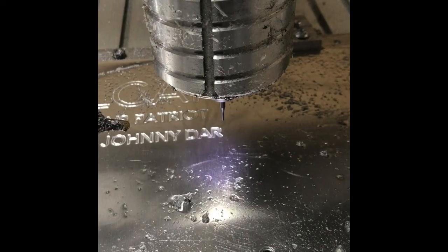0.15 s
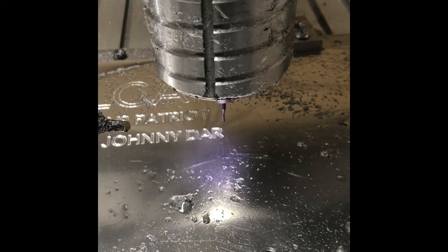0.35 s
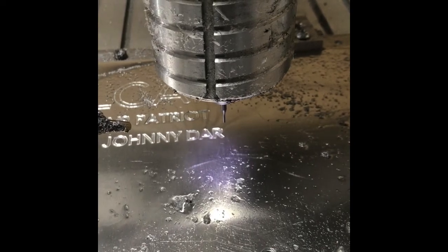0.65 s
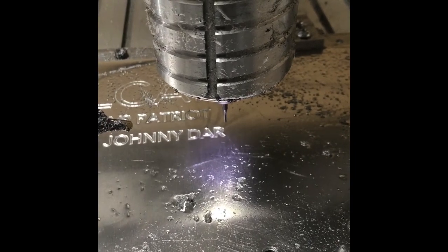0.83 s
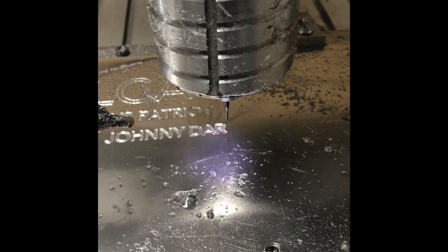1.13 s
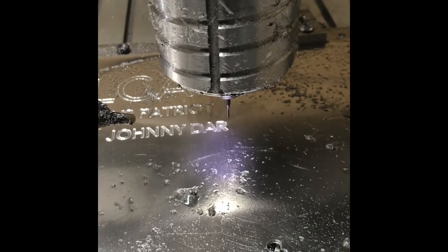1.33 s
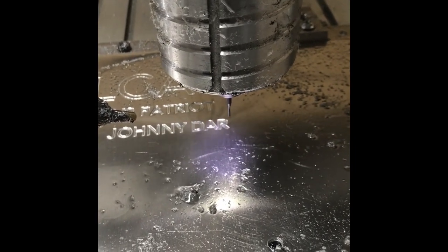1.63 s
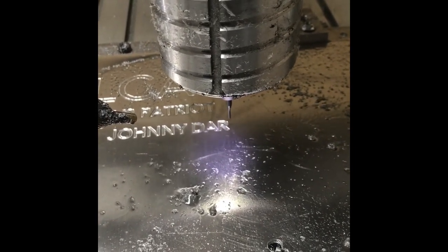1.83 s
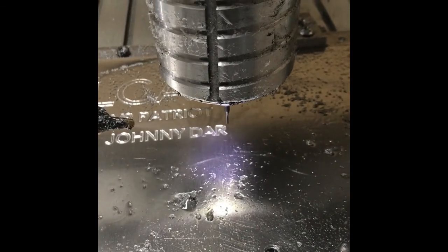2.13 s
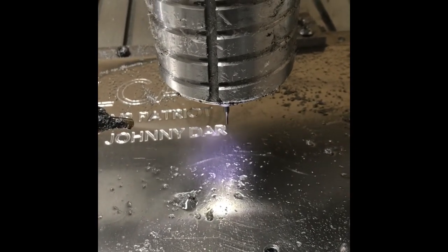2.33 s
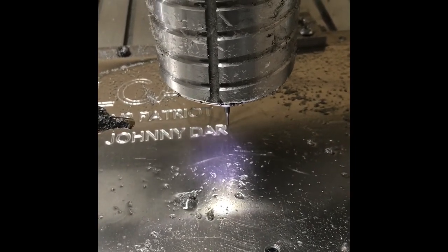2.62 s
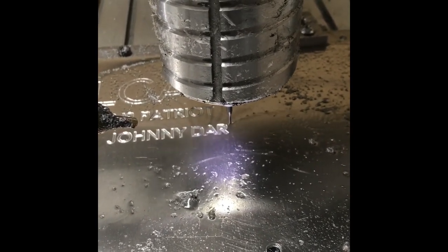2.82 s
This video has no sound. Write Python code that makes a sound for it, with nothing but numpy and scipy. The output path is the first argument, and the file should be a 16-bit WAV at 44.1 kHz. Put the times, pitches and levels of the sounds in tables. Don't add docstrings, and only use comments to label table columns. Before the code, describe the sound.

A high-speed spindle engraving sheet metal, close and nearly mono. Silence until 0.07 s, quick fade-in, steady whine around 450 Hz with strong high overtones and hissing roar, faint spark ticks. It fades to silence around 0.3-0.4 s, returning fully by 0.45. A tiny dip with faint thud at 1.53, slightly brighter hiss after. From 2.7 low hum swells; around 2.8 a rising rasp and squeal as the cutter lifts, then a lighter whine to the end.

```python
import sys
import numpy as np
from scipy import signal
from scipy.fft import rfft, irfft, next_fast_len
from scipy.io import wavfile
from scipy.ndimage import map_coordinates

SR = 44100
rng = np.random.default_rng(int(sys.argv[2]) if len(sys.argv) > 2 else 0)


def to_linear_factor(level_db):
    exponent = np.asarray(level_db, float) / 20
    return 10 ** exponent


def digitize_waveform(pressure):
    field = np.atleast_2d(pressure).T
    bounded = np.clip(field, -1, 1)
    quanta = np.round(bounded * 32767).astype(np.int16)
    wavfile.write(sys.argv[1], SR, quanta)


N = 130977
T = np.arange(N) / SR

RIPPLE_HZ = 119.87
DIP_S = 1.529
EASE_S, EASE_TAKES_S = 2.69, .1
LIFT_S, LIFT_TAKES_S = 2.815, .018

# time in seconds, tone level in dB.
TONE_GATE = [
    (.08, 2.5),
    (.13, 1),
    (.27, 1),
    (.292, -14),
    (.42, -12),
    (.438, -8),
    (.445, 0),
]


def unit(x):
    return x / np.sqrt(np.mean(x ** 2) + 1e-20)


def curve(rows):
    return np.interp(T, *np.transpose(rows))


def wobble(rate):
    knots = rng.standard_normal(int(N * rate / SR) + 4)
    return map_coordinates(knots, [T * rate])


def bump(at_s, lasts_s):
    return np.exp(-.5 * ((T - at_s) / lasts_s) ** 2)


def step(at_s, takes_s):
    return np.clip((T - at_s) / takes_s + .5, 0, 1)


def filtered(x, gain):
    m = next_fast_len(N + 8192)
    return irfft(rfft(x, m) * gain(np.fft.rfftfreq(m, 1 / SR)), m)[:N]


def band(center_hz, width_hz):
    return lambda hz: 1 / (1 + (2 * (hz - center_hz) / width_hz) ** 4)


def noise(gain):
    return unit(filtered(rng.standard_normal(N), gain))


def tone(turns, db, order):
    level = to_linear_factor(db + .15 * np.sqrt(order + 1) * wobble(20))
    return np.sqrt(2) * level * np.sin(2 * np.pi * (turns + rng.random()))


def shaft():
    # time in seconds, speed in turns per second.
    speed = [(.2, 450.7), (.5, 450.8), (.6, 451.4), (.95, 450.5), (1.32, 450.7), (1.55, 452.4),
             (1.7, 452.8), (1.9, 451.9), (2.35, 450.6), (2.8, 450.4), (2.97, 451.5)]
    return np.cumsum(curve(speed)) / SR + .0012 * wobble(40)


def whine(turns):
    orders = [1, 2, 3, 4, 5, 6, 7, 8, 9, 12, 13, 16, 18, 24, 26, 27, 29]
    # level in dB while cutting, change in dB after the brief dip, change in dB once lifted.
    order_levels = [(-25.2, .5, -6), (-47, 0, 0), (-40.5, 1.5, 2), (-24.8, 0, 0), (-29.7, -1.2, -17),
                    (-31.7, -1, -4), (-33.3, -2.5, -15), (-34.3, 0, 2), (-42, 2, 9), (-27.3, 0, 0),
                    (-24, 0, -1), (-40, 1, 0), (-42.5, 2, 3), (-42, -1, 0), (-35, 0, 0), (-47, 0, 0),
                    (-48, 0, 0)]
    cage_orders = [
        .705,
        1.041,
        7.06,
    ]
    # level in dB while cutting, change in dB once lifted.
    cage_levels = [(-47.5, -16), (-41.5, -11), (-47.5, -9)]
    side_orders = [(1, -2), (3, 2), (4, -1), (5, -3), (4, 2), (5, -1.5), (5, -1), (5, -.5), (5, 1), (6, -2),
                   (7, -2), (6, 2), (7, -1), (7, .5), (8, -3), (7, 1), (7, 1.5), (8, -2), (9, -2), (8, 2),
                   (14, -1), (13, 3), (21, 0), (4, 3), (.401, 0), (0, 2), (4, 1), (4, 1.5), (5, -2),
                   (6, -1), (8, 1), (25, 0)]
    # level in dB while cutting, change in dB once lifted.
    side_levels = [(-40.4, -15), (-45, 0), (-43, 0), (-45.5, 0), (-34.6, -3), (-45, 0), (-44, 0), (-48, 0),
                   (-43, 3), (-47, 0), (-47, 0), (-47, 0), (-49, 0), (-47, 0), (-44, 0), (-36.5, -4),
                   (-46, 0), (-48, 0), (-44, 0), (-39.5, -8), (-45, 0), (-46, 0), (-50, 0), (-52, 13),
                   (-52, -3), (-56, 0), (-50, 0), (-50, 0), (-50, 0), (-50, 0), (-47, 0), (-49, 0)]
    order_drift = {1: [(1.5, 0), (1.68, 2.2), (1.9, 0)], 4: [(2.1, 0), (2.3, 2), (2.65, 2.2), (2.9, 4.8)],
                   12: [(.3, 1), (.5, 0), (1.32, 0), (1.42, -9), (1.6, -8), (1.75, -5.5), (2.3, -6),
                   (2.45, -3.5), (2.75, -2), (2.77, -14), (2.81, -14), (2.83, -2)], 26: [(1.6, 0),
                   (2.2, -3), (2.9, -6)], 1.041: [(1.46, 0), (1.56, -16), (1.82, -16), (1.95, 0)]}

    moved = step(DIP_S, .02)
    eased = step(EASE_S, EASE_TAKES_S)
    lifted = step(LIFT_S, LIFT_TAKES_S)

    def drift(k):
        return curve(order_drift.get(k, [(0, 0)]))

    tones = []
    for k, (db, shift, change) in zip(orders, order_levels):
        tones.append((k, 0, db + shift * moved + drift(k), change))
    for k, (db, change) in zip(cage_orders, cage_levels):
        tones.append((k, 0, db + drift(k), change))
    for (k, m), (db, change) in zip(side_orders, side_levels):
        tones.append((k, m, db, change))

    total = np.zeros(N)
    for k, m, db, change in tones:
        follows_cut = k in range(4, 8) or (k < 1 and m == 0)
        released = eased if follows_cut else lifted
        total += tone(k * turns + m * RIPPLE_HZ * T, db + change * released, order=k)
    return total


def roar(turns):
    # frequency in Hz, level in dB.
    low_spectrum = [(18, -65.5), (30, -53), (205, -14.5), (387, -20.5), (450, -4), (522, -10.5), (1690, -8),
                    (1790, -5), (2600, -11), (3380, -58), (5720, -120)]
    high_spectrum = [(1530, -20.5), (2600, -14.5), (3260, -8.5), (3440, -9.5), (6050, -4), (6190, -2.5),
                     (10300, -14), (13100, -11.5), (15800, -19)]
    # frequency in Hz, width in Hz, boost in
    # dB.
    resonances = [(680.5, 114, 11), (958, 51, 8.5), (1310, 590, 10), (3200, 160, -1.5), (4480, 950, 5.8),
                  (5240, 230, 7.5), (6300, 300, -1), (8500, 450, 4), (11560, 1400, 5), (12900, 550, 2.5),
                  (10630, 500, -3), (2700, 370, 3), (14500, 700, 5), (470, 140, -4),
                  (4350, 150, 2.5), (4650, 200, 3), (4980, 180, -3.5), (5650, 200, 3), (6010, 220, -4),
             (2000, 500, -2.3), (1760, 60, -3), (2760, 80, -3), (2850, 100, 3), (800, 120, -2),
             (490, 25, -5), (7750, 300, -2), (3930, 80, -4), (14000, 500, 1.5)]
    # time in seconds, share added.
    sheet_ring = [
        (.25, .2),
        (.5, .08),
        (1.1, .08),
        (1.35, -.12),
        (2.4, -.12),
        (2.6, -.24),
    ]
    # time in seconds, share added.
    hiss = [
        (.5, -.07),
        (1.5, -.03),
        (1.75, .08),
    ]

    def through_metal(spectrum):
        f, db = np.transpose(spectrum)

        def gain(hz):
            total_db = np.interp(np.log(hz + 1), np.log(f + 1), db)
            for center_hz, width_hz, boost_db in resonances:
                total_db = total_db + boost_db / (1 + (2 * (hz - center_hz) / width_hz) ** 2)
            return to_linear_factor(total_db)
        return gain

    bass_lift_db = -.35 * np.minimum(curve(TONE_GATE), 0)
    low = to_linear_factor(-27.5 + bass_lift_db + .17 * wobble(7.8)) * noise(through_metal(low_spectrum))
    bass = filtered(low, lambda hz: 1 / (1 + (hz / 480) ** 8))
    low = low + bass * (to_linear_factor(-6 * step(LIFT_S, LIFT_TAKES_S)) - 1)
    chips = noise(band(3250, 450))
    low = low + to_linear_factor(-38 - 6 * step(EASE_S, EASE_TAKES_S)) * chips

    high = to_linear_factor(-20 + .21 * wobble(7.7)) * noise(through_metal(high_spectrum))
    high = high - .45 * bump(2.785, .025) * filtered(high, band(5000, 1400))
    high = high + curve(sheet_ring) * filtered(high, band(4600, 1100))
    high = high + curve(hiss) * filtered(high, lambda hz: (hz > 8200) * (hz < 11500))

    mains_pulse = 1 + .17 * np.sin(4 * np.pi * RIPPLE_HZ * T)
    turn_pulse = 1 + .07 * np.sin(2 * np.pi * turns)
    return low * mains_pulse + high * turn_pulse


def sparks():
    # start in seconds, level in dB.
    strong = [(.09575, 4), (.12905, 0), (.16234, .5), (.1668, -2.5), (.17122, -3), (.22892, -1),
              (.46733, -1), (.5006, -5)]
    rate, faint_db, spark_s = 40, -19, .00004
    faint = to_linear_factor(faint_db + 1.3 * rng.standard_normal(N)) * rng.choice([-1, 1], N)
    hits = (rng.random(N) < rate / SR) * faint
    for s, db in strong:
        hits[round(s * SR)] = to_linear_factor(db)
    u = np.arange(-20, 21) / SR / spark_s
    tick = (1 - .22 * u * u) * np.exp(-.2 * u * u)
    return np.convolve(hits, tick, "same")


def hum(turns):
    # time in seconds, level in dB.
    hum_level = [(0.46, -40), (0.86, -46), (1.0, -43), (1.65, -46.5), (2.01, -41.5), (2.48, -41),
                 (2.7, -30.5), (2.84, -29), (2.96, -31)]
    db = curve(hum_level)
    ripple = tone(RIPPLE_HZ * T, db, order=2)
    beat = tone(turns - RIPPLE_HZ * T, db - 15.5, order=2)
    return ripple + beat


def side_bursts():
    # time in seconds, low edge in kHz, high edge in kHz.
    bursts = [(.557, 6.2, 8.3), (.557, 9.6, 11), (.673, 6.2, 9), (1.022, 14.5, 15.8), (1.068, 14.5, 15.8),
              (1.207, 6.2, 7.6), (1.231, 4.1, 5.2), (1.231, 8.3, 9.6), (1.3, 6.9, 8.3), (1.3, 12.4, 13.8),
              (1.416, 9, 10.3), (1.486, 4.1, 5.2), (1.602, 13.1, 14.5), (2.043, 13.1, 14.5),
              (2.113, 4.7, 5.7), (2.113, 8.3, 9.6), (2.113, 12.4, 13.8), (2.229, 12.4, 14.5),
              (2.577, 4.1, 5.2), (2.577, 13.1, 14.5), (2.624, 7.6, 9), (2.624, 12.4, 14.5),
              (2.694, 9.6, 11), (2.879, 4.1, 5.2), (2.949, 10.3, 11.7)]
    size, hop = 2048, 1024
    other = np.pad(roar(shaft()), (0, size))
    side = np.zeros(N + size)
    window = signal.windows.kaiser_bessel_derived(size, 4 * np.pi)
    khz = np.fft.rfftfreq(size, 1000 / SR)
    for s, low_khz, high_khz in bursts:
        first = (round(s * SR / hop) - 1) * hop
        frame = slice(first, first + size)
        inside = (khz > low_khz) * (khz < high_khz)
        side[frame] += window * irfft(rfft(other[frame]) * inside)
    return to_linear_factor(-3.5) * side[:N]


def brief_dip(mix):
    dip_db = -3.8 * bump(DIP_S, .007)
    thud = to_linear_factor(-42) * bump(DIP_S, .005) * np.sin(2 * np.pi * 60 * (T - DIP_S))
    jolt = to_linear_factor(-37) * bump(DIP_S, .0079) * np.sin(2 * np.pi * 415 * T)
    return mix * to_linear_factor(dip_db) + thud + jolt


def rasp():
    def scrape(at_s, lasts_s, hz, rise_hz_per_s, width_hz, db):
        grit = noise(band(0, width_hz))
        turns = hz * T + .5 * rise_hz_per_s * (T - at_s) ** 2
        return np.sqrt(2) * to_linear_factor(db) * bump(at_s, lasts_s) * grit * np.sin(2 * np.pi * turns)

    groove = scrape(2.775, .065, hz=2030, rise_hz_per_s=1000, width_hz=360, db=-28.5)
    squeal = scrape(2.805, .03, hz=2200, rise_hz_per_s=3200, width_hz=30, db=-33)
    return groove + squeal


def scene():
    turns = shaft()
    tones = to_linear_factor(curve(TONE_GATE)) * (whine(turns) + hum(turns))
    mix = tones + roar(turns) + sparks() + rasp()
    mix = filtered(mix, lambda hz: hz ** 2 / np.sqrt(hz ** 4 + 90 ** 4))
    mix = brief_dip(mix)
    return np.array([mix, mix])


def top_cut(x):
    return signal.sosfilt(signal.butter(12, 15930, fs=SR, output="sos"), x)


def record(dry):
    # time in seconds, level in dB.
    fader = [(.068, -120), (.073, -44), (.082, -20.5), (.097, -13), (.12, -4), (.145, -0.5), (.264, -1),
             (.281, -10), (.297, -30), (.318, -49), (.34, -110), (.383, -110), (.405, -44), (.418, -24),
             (.44, -11), (.449, 0)]
    fader_db = curve(fader)
    mono = filtered(dry[0], lambda hz: hz < 15770)
    mono = mono * to_linear_factor(fader_db) * (fader_db > -62)
    mix = mono + side_bursts() * [[1], [-1]]
    return top_cut(mix)


dry = scene()
out = record(dry)
digitize_waveform(out)
```